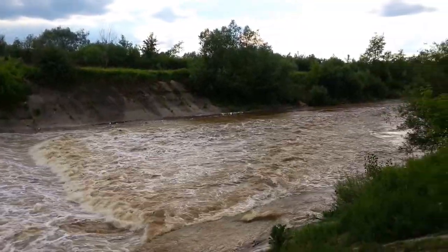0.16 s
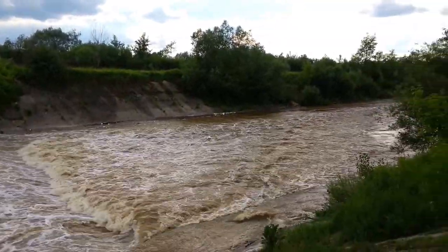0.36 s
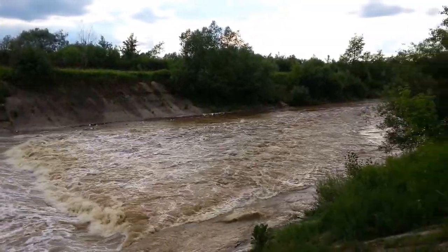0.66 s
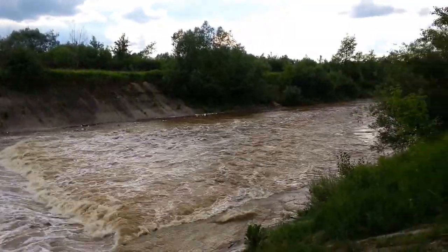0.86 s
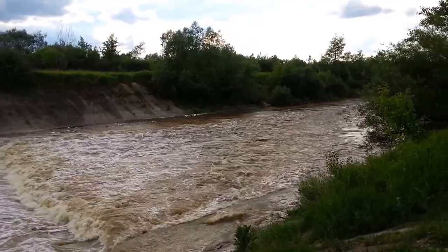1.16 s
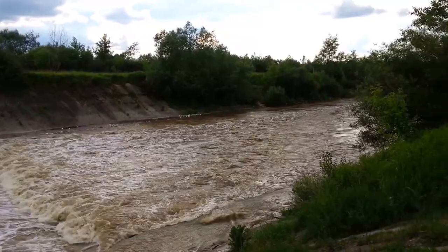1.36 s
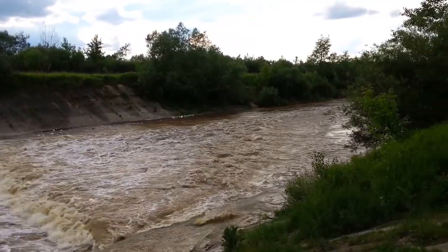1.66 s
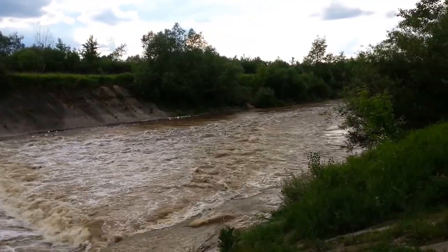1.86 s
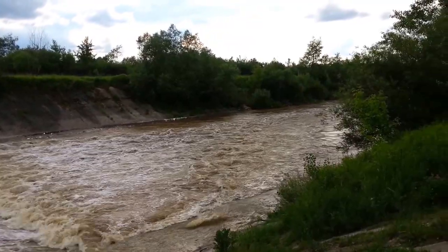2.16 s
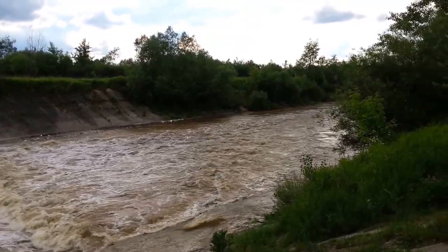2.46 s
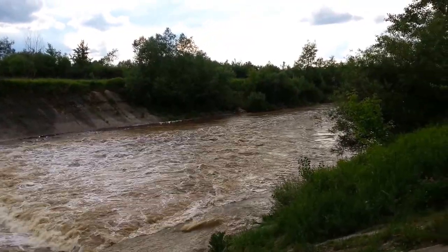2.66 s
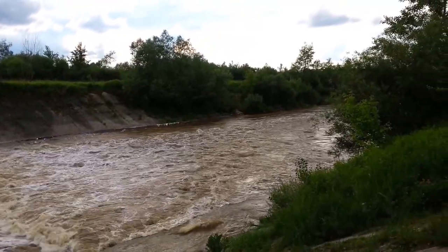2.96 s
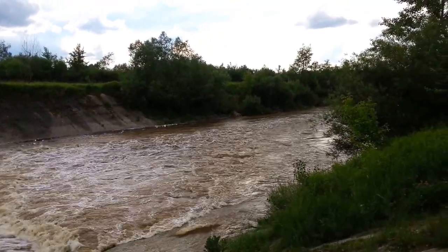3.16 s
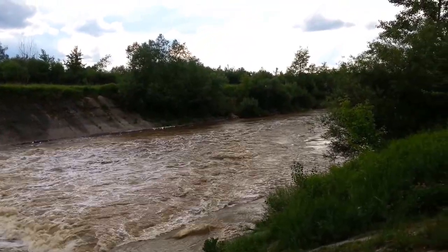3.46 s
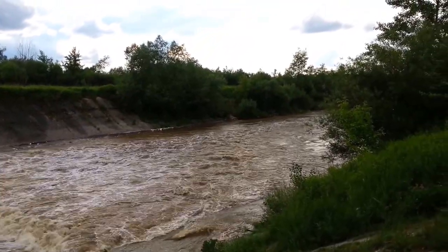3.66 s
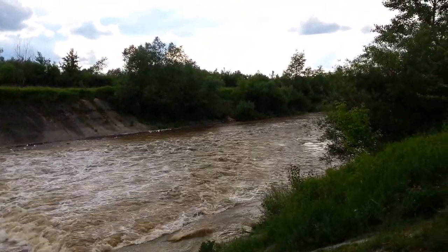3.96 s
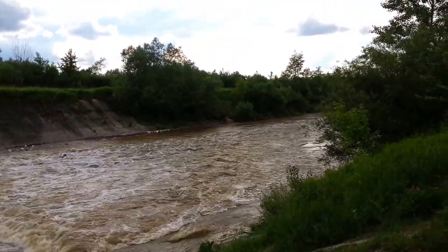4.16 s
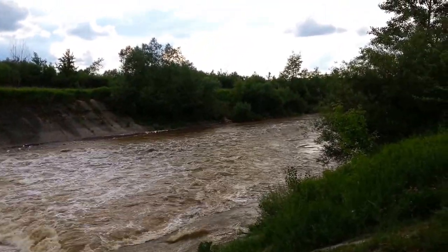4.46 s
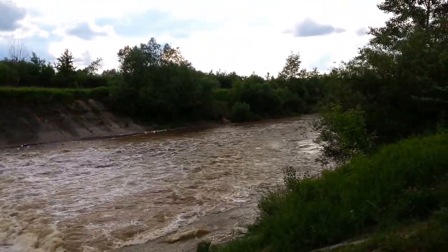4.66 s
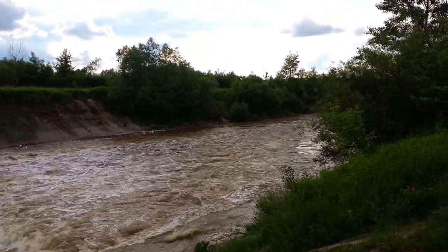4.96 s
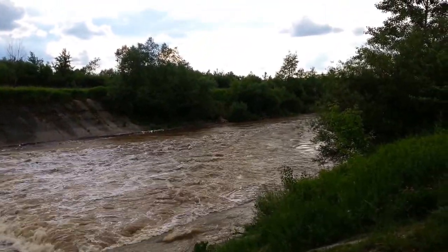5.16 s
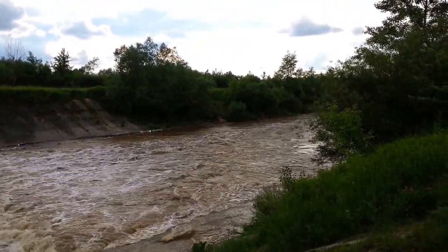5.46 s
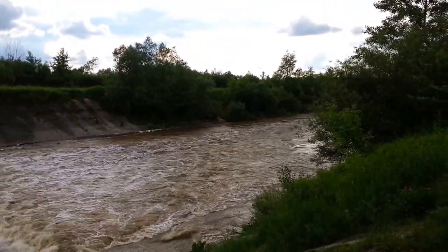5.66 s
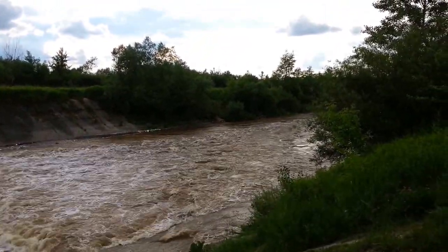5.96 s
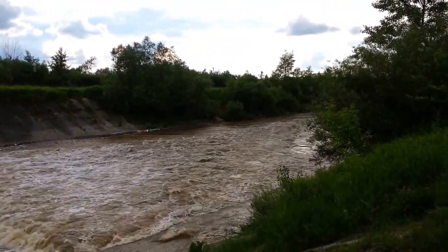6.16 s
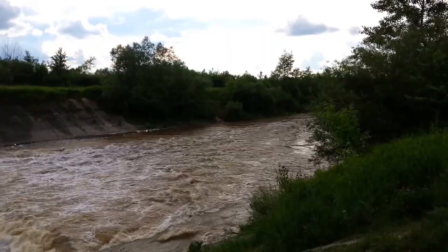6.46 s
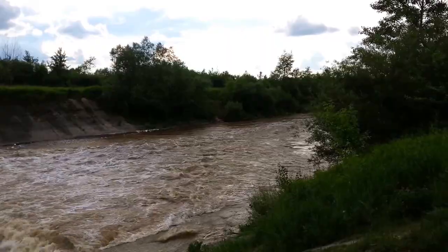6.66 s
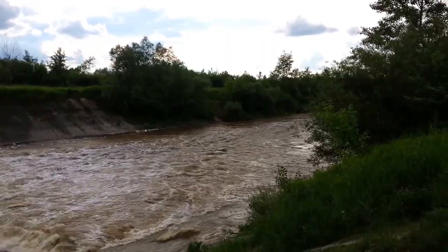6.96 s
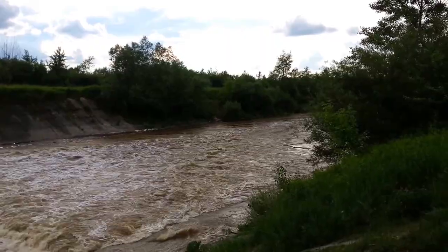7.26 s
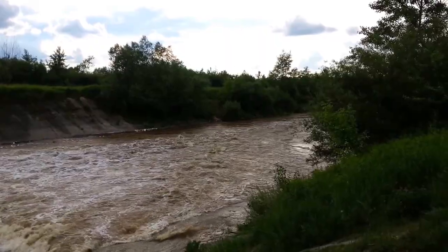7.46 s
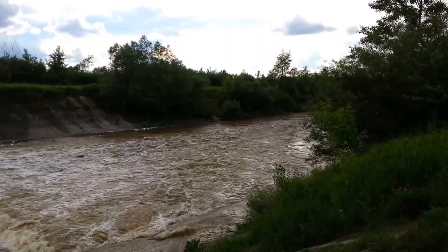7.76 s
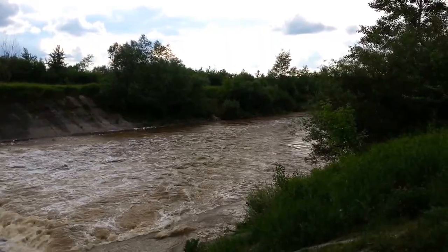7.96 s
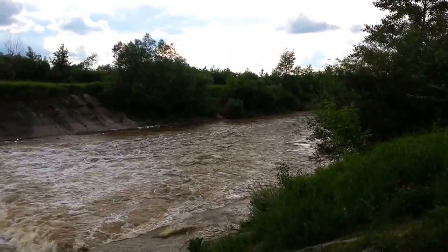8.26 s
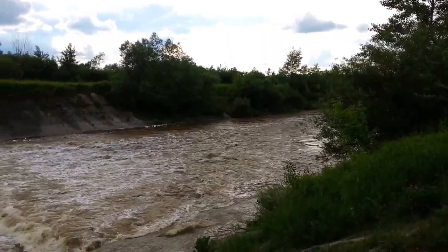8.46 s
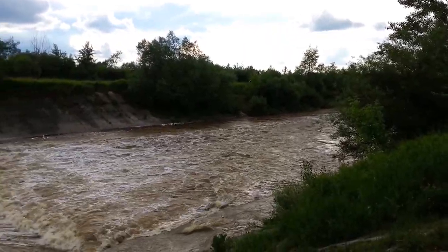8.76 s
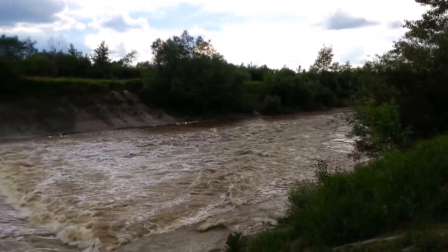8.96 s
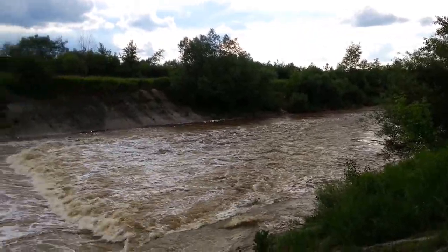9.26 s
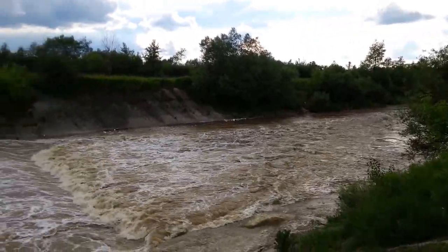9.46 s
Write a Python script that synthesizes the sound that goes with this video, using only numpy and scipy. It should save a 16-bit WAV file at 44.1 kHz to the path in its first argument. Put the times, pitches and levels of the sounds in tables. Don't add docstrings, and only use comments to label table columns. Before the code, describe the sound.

Muddy floodwater pours over a low weir and churns below it in a loud, even, continuous rush with faint quick surges and splashes.

```python
import sys
import numpy as np
from scipy import signal
from scipy.fft import rfft, irfft, next_fast_len
from scipy.io import wavfile

SR = 44100
rng = np.random.default_rng(int(sys.argv[2]) if len(sys.argv) > 2 else 0)


def transcribe(u):
    v = np.clip(np.atleast_2d(u).T, -1, 1)
    q = np.round(v * 32767).astype(np.int16)
    wavfile.write(sys.argv[1], SR, q)


def nominal_scale(level):
    x = np.asarray(level, float) / 20
    return 10 ** x


N = 423338

BURSTS_PER_S, BURST_SPREAD_DB = 30000, 1.5
# pitch_hz, surge_share, flicker_db, slap_db
BUBBLE_SIZES = [
    (60, 0.74, -0.2, 1),
    (250, 0.93, -0.23, 0.33),
    (700, 1.2, 0, 0.56),
    (1430, 0.85, .5, 0.27),
    (2500, 0.91, 0.63, 0.5),
    (4520, 1.05, .5, 0.36),
    (9000, 0.97, 0.4, 0.5),
]
# start_s, level_db, lean_to_large_db_per_octave
WEIR_FLOW = [(0, .8, -0.15), (.6, 0.64, 0.06), (1.2, .5, 0.16), (1.8, 1.2, 0.07), (2.4, 0.86, 0.27),
             (3, 1.3, 0.25), (3.6, .4, .1), (4.2, 1.1, 0.36), (4.8, 1.5, 0.05), (5.4, 0.1, 0),
             (6, 0.6, -0.04), (6.6, .5, 0.04), (7.2, 0.36, -0.06), (7.8, 0.6, -0.14), (8.4, -0.4, .1),
             (9, 1.7, 0.2), (9.6, 2.5, .1)]
MIDDLE_HZ, LEAN_LIMIT_OCTAVES = 1400, 2.2
SWELL_DB, SWELL_HZ, FLICKER_HZ, SLAP_HZ = 0.29, 1.7, 9.3, 13.3
# centre_s, depth_db, width_s, large_bubble_sag_db_per_octave
PLUNGE_LULLS = [(0.508, 2, 0.056, 0.3), (0.749, 2, 0.031, -0.3), (1.213, 1.1, 0.029, -0.2),
                (1.542, 1.8, 0.028, 0.3), (1.745, 3, 0.034, -0.2), (1.881, 2.8, 0.023, 0.5),
                (1.987, 3.5, 0.02, 0.5), (2.14, 2, 0.038, 0.1), (2.242, 2.1, 0.022, -0.3),
                (2.625, 1.3, 0.026, 0.3), (2.793, 2, 0.051, 0.2), (3.08, 3.5, 0.061, -0.1),
                (3.299, 1.5, 0.064, 0.3), (3.548, 3.5, 0.037, 0.1), (4.008, 2.5, 0.035, 0.3),
                (4.196, 3.5, 0.024, 0.4), (4.361, 2.5, 0.037, 0.2), (4.534, 2.3, 0.022, 0.5),
                (4.735, 4.5, 0.038, 0.5), (5.042, 1.2, 0.044, -0.2), (5.188, 2.2, 0.017, -0.8),
                (5.355, 2, 0.032, -0.3), (5.522, 3, 0.025, 0.1), (6.1, 1.8, 0.034, -0.2),
                (6.285, 1.8, 0.015, -0.5), (6.526, 2, 0.026, 0.1), (7.934, 2, 0.015, -0.4),
                (8.121, 2.1, 0.02, 0.6), (8.783, 2.5, 0.064, 0.1), (9.436, 3.5, 0.13, 0)]
SAG_TO_REFILL = 1.56
# centre_s, pitch_hz, lift_db, width_s
CHURN_PATCHES = [(.215, 160, 2.6, .04), (.484, 780, 1.5, .04), (.584, 920, 2.5, 0.029),
                 (1.392, 5230, 1.5, 0.036), (1.512, 160, 1.5, .04), (1.851, 230, 2.5, 0.045),
                 (2.32, 390, 1.9, .04), (2.49, 2000, 0.5, .04), (2.9, 2000, 1, .04), (3.203, 160, 2, .04),
                 (3.547, 1310, 2, .04), (4.615, 200, 2.2, .04), (4.82, 600, 0.5, 0.035),
                 (5.004, 390, 2.1, .04), (5.932, 550, 2, 0.032), (6.42, 2000, 0, 0.036),
                 (6.63, 390, 2.5, .04), (6.755, 1310, 3, 0.028), (6.934, 200, 2, .04),
                 (7.234, 650, 2, 0.036), (7.53, 400, 2, .04), (7.678, 160, 3, 0.037),
                 (7.85, 2200, 0.5, 0.033), (8.082, 330, 1.5, .04), (8.346, 190, 3, .04),
                 (8.516, 920, 2.5, .04), (9.024, 200, 1.5, .04), (9.1, 3000, 1.5, .04)]
PATCH_SPREAD_OCTAVES = 0.81
CURVE_STEP_S, DRIFT_STEP = 0.002, 40

# pitch_hz, density_db_per_hz
LEFT_COLOUR = [(30, -84), (50, -86.5), (160, -53.5), (280, -48.5), (430, -53.5), (700, -49), (1000, -51),
               (1950, -47.5), (3400, -60), (4400, -59.0), (6300, -73.5), (7800, -74), (9800, -73),
               (14400, -80)]
# pitch_hz, density_db_per_hz
RIGHT_COLOUR = [(30, -82), (50, -81.5), (160, -52.5), (280, -47.5), (400, -53.5), (560, -47), (700, -49),
                (830, -53.5), (1200, -52), (2100, -57.5), (4400, -57.5), (6000, -67.5), (12500, -72.5),
                (14400, -73)]
# pitch_hz, weir_power_share (0-1)
WEIR_SHARE = [(43, 0.32), (110, 0.95), (300, 1), (430, 0.8), (550, 0.98), (720, 0.92), (1000, 0.62),
              (1700, 0.56), (2050, 0.44), (2600, 0.74), (3300, 0.14), (5500, 0.1), (7400, 0.18),
              (11000, 0.4)]
# pitch_hz, lag_rad
LEFT_PHASE_LAG = [(60, -0.03), (450, 0.36), (750, 0.62), (1000, 1.17), (1200, 1.5), (1900, 3.5),
                  (2300, 5.5), (2800, 7), (3300, 9), (4400, 9), (5400, 14), (6100, 10), (8000, 16),
                  (12000, 25.5)]
# pitch_hz, threshold_db
TREBLE_FLOOR = [(8000, -89), (10500, -77), (12000, -73.5), (13200, -71.5), (14300, -67)]
FRAME, FRAME_START = 2048, 437
LEFT_KEEPS_DB, FOLLOWS_LEVEL = 3, 0.9
LEFT_FADES_HZ, LEFT_FADE_DB_PER_KHZ = 11800, 7
CEILING = 0.92


def bursts():
    born = rng.random((3, N)) < BURSTS_PER_S / SR
    size_db = BURST_SPREAD_DB * np.minimum(rng.exponential(1, (3, N)), 4)
    clicks = born * nominal_scale(size_db) * rng.standard_normal((3, N))
    return clicks / np.std(clicks)


def water(hz, size):
    surge_db, lean_db = surge()
    slap = drift(SLAP_HZ)
    cloud = rfft(bursts(), size)
    log_pitches = np.log(np.array(BUBBLE_SIZES)[:, 0])
    total = 0
    for one, (pitch_hz, share, flicker_db, slap_db) in zip(np.eye(len(BUBBLE_SIZES)), BUBBLE_SIZES):
        weight = np.interp(np.log(hz), log_pitches, one)
        band = irfft(cloud * weight, size)[:, :N]
        octaves = np.clip(np.log2(MIDDLE_HZ / pitch_hz), -LEAN_LIMIT_OCTAVES, LEAN_LIMIT_OCTAVES)
        level_db = share * surge_db + octaves * lean_db + patches(pitch_hz)
        level_db = level_db + SWELL_DB * drift(SWELL_HZ)
        level_db = level_db + flicker_db * drift(FLICKER_HZ) + slap_db * slap
        total = total + band * nominal_scale(level_db)
    return total


def surge():
    level_db, lean_db = in_time(WEIR_FLOW)
    dents = np.array([bump(s, width_s * SAG_TO_REFILL, width_s / SAG_TO_REFILL)
                      for s, _, width_s, _ in PLUNGE_LULLS])
    _, depth_db, _, large_db = np.transpose(PLUNGE_LULLS)
    return level_db - fine(depth_db @ dents), lean_db - fine(large_db @ dents)


def patches(pitch_hz):
    lift_db = 0
    for s, patch_hz, peak_db, width_s in CHURN_PATCHES:
        distance = np.log2(patch_hz / pitch_hz) / PATCH_SPREAD_OCTAVES
        lift_db = lift_db + peak_db * np.exp(-0.5 * distance ** 2) * bump(s, width_s, width_s)
    return fine(lift_db)


def drift(rate_hz):
    pole = np.exp(-2 * np.pi * rate_hz * DRIFT_STEP / SR)
    noise = rng.standard_normal(N // DRIFT_STEP + 2002)
    slow = signal.lfilter([1], [1, -2 * pole, pole * pole], noise)[2000:]
    return np.interp(np.arange(N) / DRIFT_STEP, np.arange(len(slow)), slow / slow.std())


def bump(s, before_s, after_s):
    coarse_s = np.arange(0, N / SR + 0.01, CURVE_STEP_S)
    return np.exp(-0.5 * ((coarse_s - s) / np.where(coarse_s < s, before_s, after_s)) ** 2)


def fine(coarse):
    return np.interp(np.arange(N) / SR, CURVE_STEP_S * np.arange(len(coarse)), coarse)


def in_time(rows):
    s, *columns = np.transpose(rows)
    return [np.interp(np.arange(N) / SR, s, column) for column in columns]


def at_hz(points, hz):
    table_hz, values = np.transpose(points)
    return np.interp(np.log(hz), np.log(table_hz), values)


def ports(clouds, hz, size):
    weir, foam_left, foam_right = rfft(clouds, size)
    alike = np.clip(at_hz(WEIR_SHARE, hz), 0, 1)
    direct, diffuse = np.sqrt(alike), np.sqrt(1 - alike)
    late = np.exp(-1j * np.interp(hz, *np.transpose(LEFT_PHASE_LAG)))
    left = nominal_scale(at_hz(LEFT_COLOUR, hz)) * (direct * weir * late + diffuse * foam_left)
    right = nominal_scale(at_hz(RIGHT_COLOUR, hz)) * (direct * weir + diffuse * foam_right)
    return irfft(np.array([left, right]), size)[:, :N] * np.sqrt(SR / 2)


def thin_treble(x):
    window = dict(fs=SR, window="cosine", nperseg=FRAME, noverlap=FRAME // 2, scaling="psd")
    hz, _, parts = signal.stft(np.pad(x, ((0, 0), (FRAME_START, 0))), **window)
    treble = np.abs(parts[:, hz > 7000]).mean(axis=1, keepdims=True)
    riding = (treble / treble.mean(axis=2, keepdims=True)) ** FOLLOWS_LEVEL
    riding = riding * nominal_scale([[[-LEFT_KEEPS_DB]], [[0]]])
    fade_db = LEFT_FADE_DB_PER_KHZ * np.maximum(hz - LEFT_FADES_HZ, 0) / 1000
    floor_db = at_hz(TREBLE_FLOOR, hz + 1) + np.outer([1, 0], fade_db)
    kept = np.abs(parts) > nominal_scale(floor_db)[:, :, None] * riding
    return signal.istft(parts * kept, **window)[1][:, FRAME_START:FRAME_START + N]


def scene():
    size = next_fast_len(N)
    hz = np.maximum(np.arange(size // 2 + 1) * SR / size, 1)
    return ports(water(hz, size), hz, size)


def top_cut(x):
    return signal.sosfilt(signal.butter(12, 14430, fs=SR, output="sos"), x)


def record(dry):
    rounded = dry / (1 + (dry / CEILING) ** 4) ** 0.25
    return top_cut(thin_treble(rounded))


dry = scene()
out = record(dry)
transcribe(out)
```